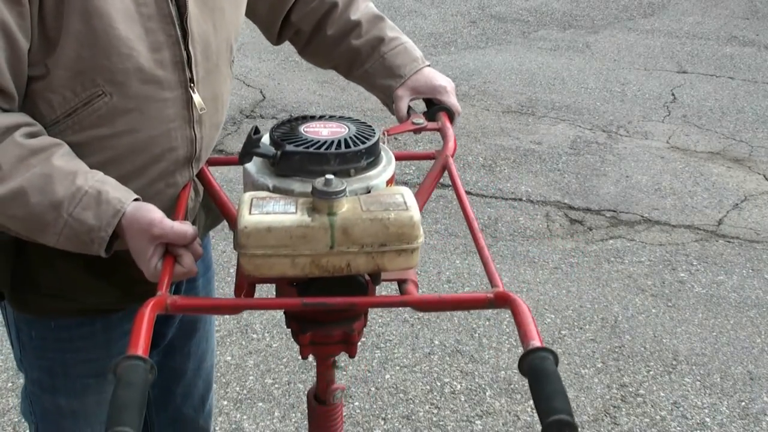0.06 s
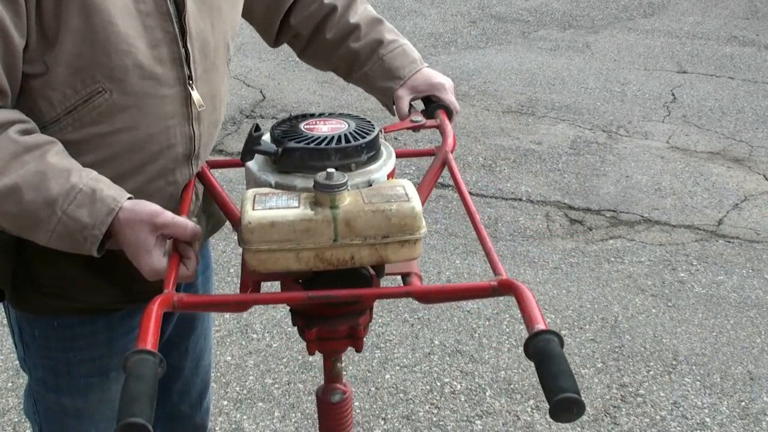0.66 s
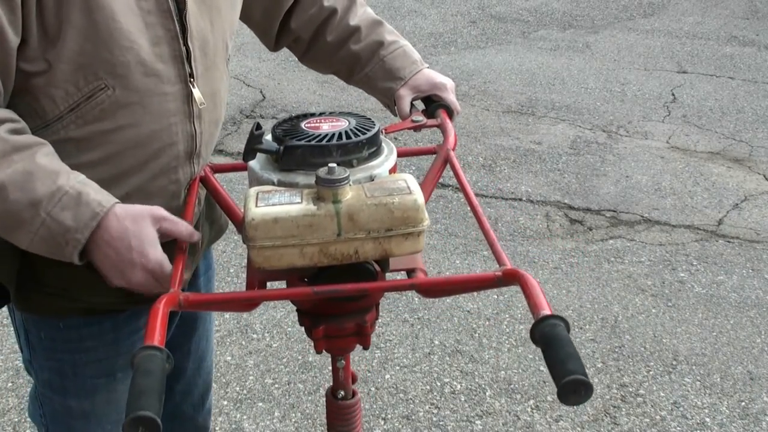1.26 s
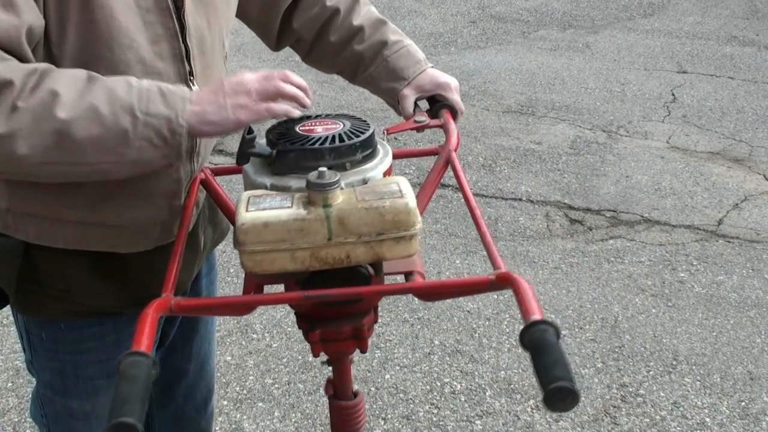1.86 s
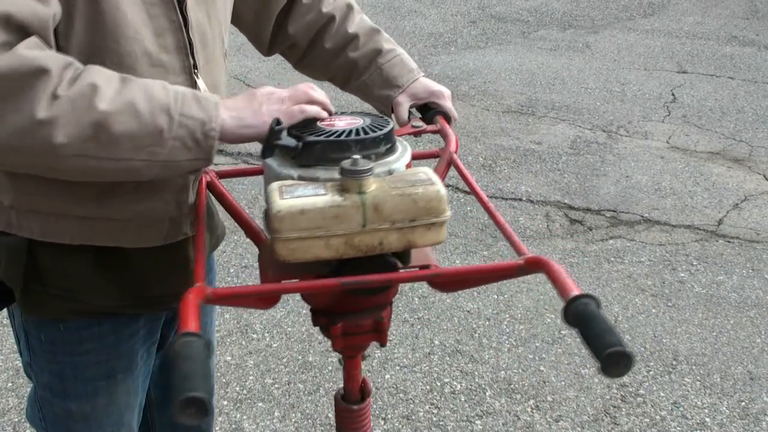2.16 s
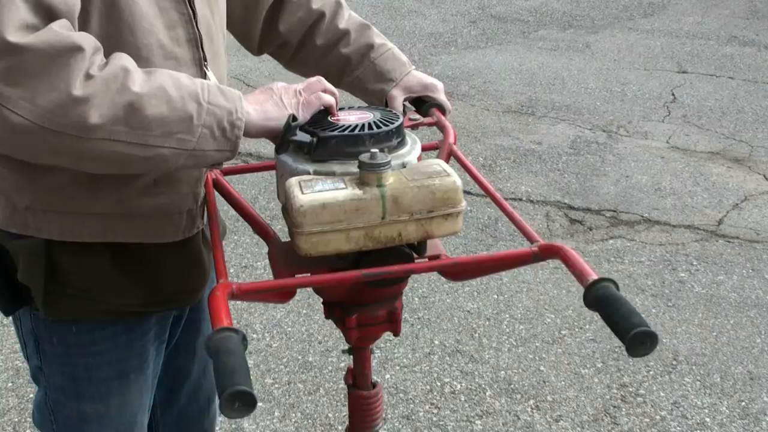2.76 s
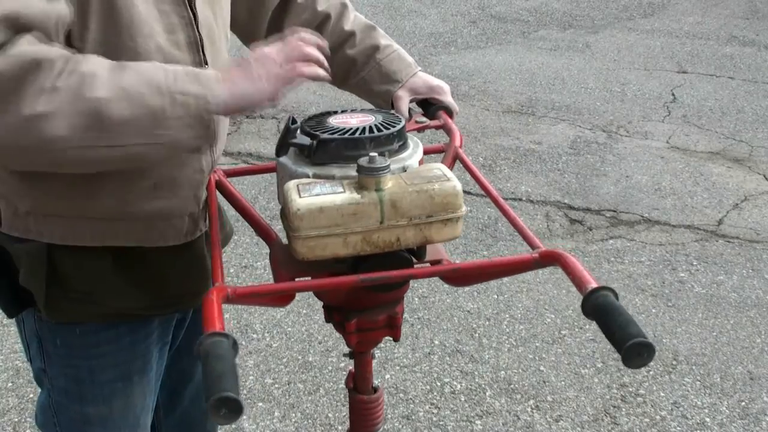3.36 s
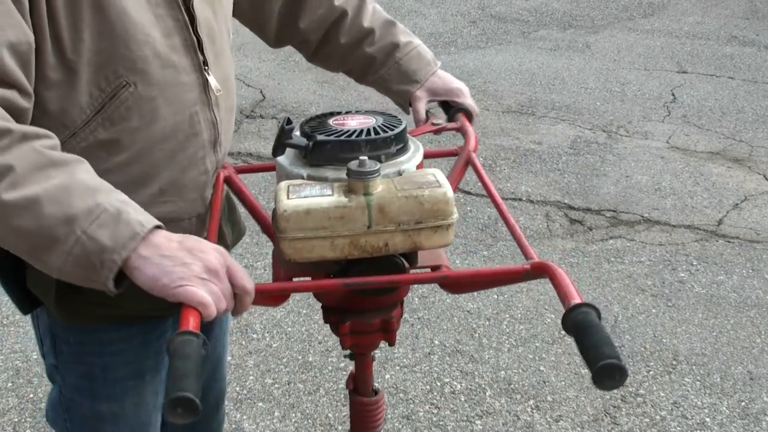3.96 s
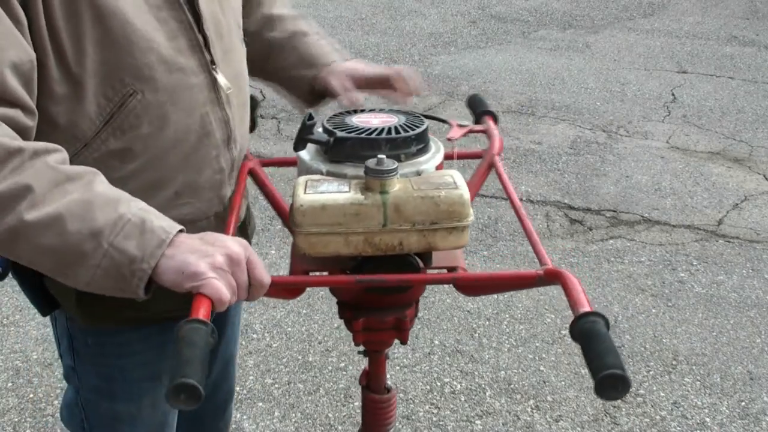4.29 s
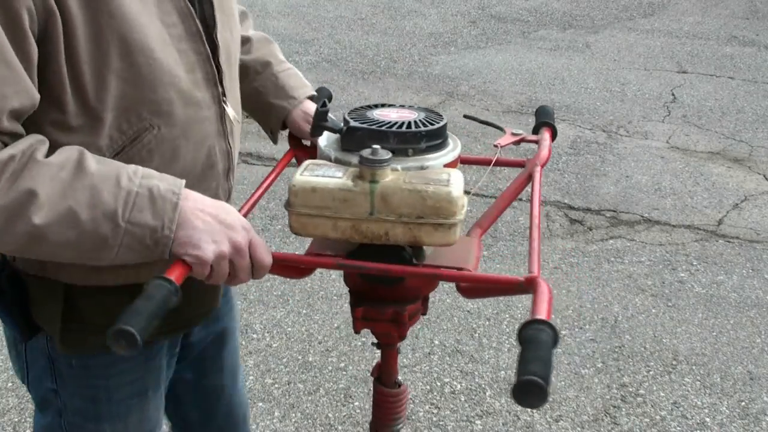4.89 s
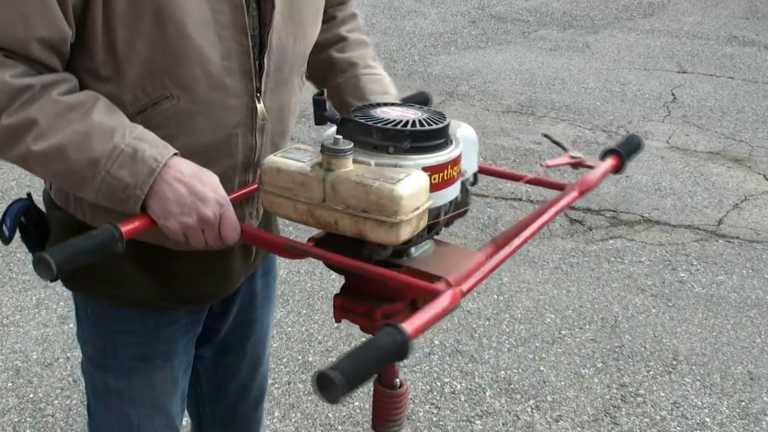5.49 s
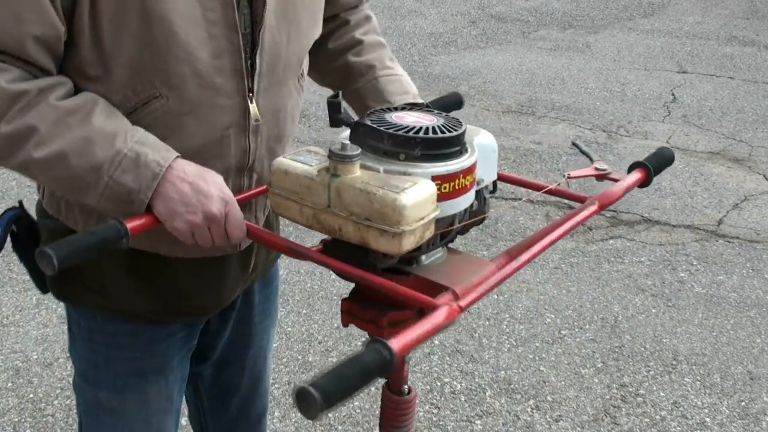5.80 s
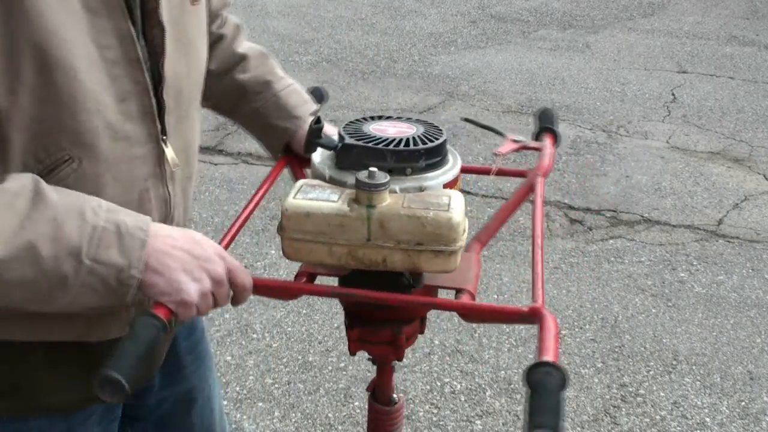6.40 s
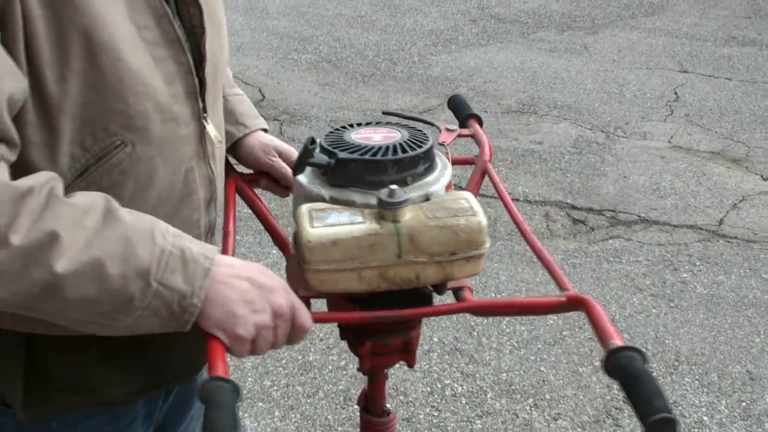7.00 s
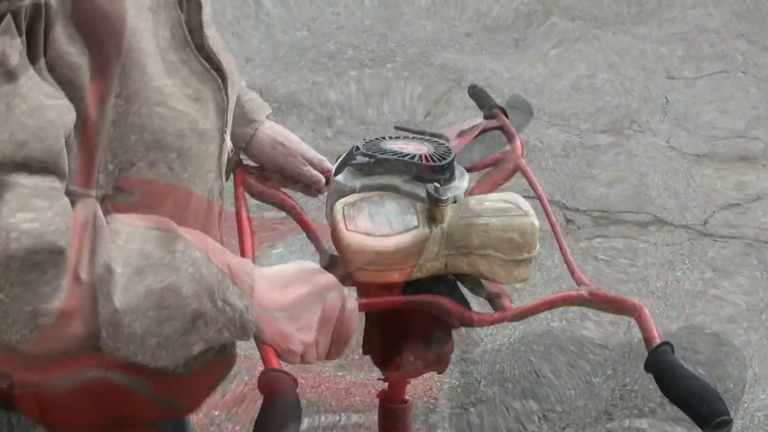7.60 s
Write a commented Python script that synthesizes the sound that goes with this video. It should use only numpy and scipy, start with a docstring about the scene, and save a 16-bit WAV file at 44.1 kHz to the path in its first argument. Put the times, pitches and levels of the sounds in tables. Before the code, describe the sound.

A hole auger's small petrol engine putters near the microphone, with irregular exhaust pops and a tinny metal rattle. The firing stops and the engine coasts down in slowing, hissy chuffs, rocking to a halt a little past halfway. The rest is much quieter: loose steel parts clink and the frame knocks as the machine is tilted, with far-off traffic and light wind in the open air.

```python
"""The small two-stroke engine of a hole auger idles unevenly on asphalt: once a turn, gas pulses excite
the resonances of its muffler and cavities, while its clutch and frame rattle. The ignition is cut:
the piston pumps on ever slower, rocks against compression and stops. The machine is then tilted by
its handles, and loose steel clinks in its natural modes, over distant traffic and a little wind."""
import sys
import numpy as np
from scipy import signal
from scipy.fft import rfft, irfft, next_fast_len
from scipy.io import wavfile
from scipy.ndimage import map_coordinates

SR = 44100
rng = np.random.default_rng(int(sys.argv[2]) if len(sys.argv) > 2 else 0)


def int16_out(signal):
    """Quantize to a 16-bit WAV file."""
    q = np.round(np.clip(np.atleast_2d(signal).T, -1, 1) * 32767)
    wavfile.write(sys.argv[1], SR, q.astype(np.int16))


N = 337365
TIME, AGE = np.arange(N) / SR, np.arange(SR) / SR  # seconds into the scene, and into one event

# The hunting idle. Each row: time in seconds, speed in turns per second.
IDLE_SPEED = [(0.0, 65.43), (0.12, 64.62), (0.44, 51.35), (0.73, 48.73), (0.88, 45.25), (1.12, 45.25),
              (1.48, 51.18), (2.19, 49.71), (2.69, 41.7), (2.88, 40.89), (3.04, 43.49), (3.15, 47.72)]
# Strength of the shaking and of the exhaust, then the level of the air box. Each row: time in seconds, gain in
# dB.
EFFORT = [(0, -0.5), (.35, -1.5), (.5, -3.5), (.72, 1), (1.75, 0.5), (1.8, -4.5), (1.85, 0), (1.95, -0.5),
          (2.0, 2), (2.6, .5), (2.83, -2), (2.92, 0), (3.26, 2), (3.38, 2)]
BOX_LEVEL = [(.35, -27), (.55, -28), (1.65, -28.5), (2.1, -26.5), (3.1, -26.5), (3.35, -22.5)]
# Full charges. Each row: time in seconds, level in dB over an ordinary firing.
BARKS = [(.22, 9), (.307, 9), (.361, 9), (.513, 8), (1.379, 7), (1.518, 7.5), (1.635, 9), (1.695, 6),
         (1.735, 8), (1.775, 7), (1.853, 9), (1.912, 9), (2.031, 9), (2.092, 8), (2.173, 7.5), (2.254, 9),
         (2.336, 8), (2.379, 9), (2.52, 7), (2.695, 7.5), (2.865, 6), (2.939, 6), (3.142, 7)]
# Gas waves. Each row: crank angle and width in turns, cycles per turn, firing and coasting gains in dB.
PORT_WAVES = [(-0.044, 0.13, 5.7, -33, -2), (-0.019, 0.16, 9.1, -12, -0.5),
              (-0.0447, 0.4, 13.57, -8.5, -21), (-0.117, 0.12, 22, -11, -4)]
# Slaps of the drive. Each row: start in seconds, level in dB.
SLAPS = [(.1216, -19.5), (0.169, -14.5), (0.5096, -21), (0.606, -18), (.9448, -22.5), (1.446, -15),
         (1.6134, -16.5), (1.8273, -12.5), (2.249, -15), (2.3314, -21), (2.532, -16.5), (2.6923, -12),
         (2.8604, -17)]
# Loose covers. Each row: peak in seconds, level in dB, half length in seconds, pitch and width in Hz.
BUZZES = [(.17, -41, 0.19, 3950, 200), (1.08, -37.5, 0.86, 3280, 260), (2.454, -35, 0.24, 5030, 600),
          (2.936, -36, .06, 5550, 402), (3.002, -32, 0.31, 864, 110)]
# The last rocks. Each row: time in seconds, knock and puff in dB, flywheel pitch in Hz, its ring in dB.
ROCKS = [(3.916, -17, -36, 934, -44), (4.016, -17.5, -32, 942, -42), (4.145, -22, -41, 980, -55.5),
         (4.3203, -23, -51, 1046, -46.5)]
# Loose steel at the coupling. Each row: start in seconds, strength in dB, number of contacts.
CLINKS = [(4.52, -42.5, 1), (4.673, -46, 1), (4.714, -51, 1), (4.887, -50.5, 1), (5.027, -45.5, 2),
          (5.147, -50, 1), (5.184, -43, 2), (5.239, -47, 3), (5.317, -51, 1), (6.088, -48, 1),
          (6.406, -43.5, 2), (6.999, -47, 1), (7.025, -27.5, 1), (7.1354, -43, 1), (7.492, -51, 1)]
# The coupling's modes. Each row: frequency in Hz, relative level in dB, 60 dB decay time in seconds.
COUPLING_MODES = [(2610, -1, 0.3), (3650, -10, .25), (4580, -1, 0.13), (4980, 0, 0.24), (5430, -9, .2),
                  (5679, -3, 0.12), (7003, 0, .16), (7270, -2, 0.14), (9150, -5, .15)]
# Frame and handles. Each row: start in seconds, level in dB, centre in Hz, 60 dB decay time in seconds.
FRAME_KNOCKS = [(5.963, -48, 5600, 0.014), (6.076, -42.5, 1920, 0.048), (6.567, -27, 4200, 0.0061),
                (6.58, -38.5, 334, 0.13), (6.6, -51, 2650, 0.37)]
# Swells of noise. Each row: peak time in seconds, level in dB, half length in seconds.
CRANK_SWEEPS = [(3.962, -38, 0.0093), (4.095, -42, 0.03), (4.245, -51.5, 0.026)]
STEEL_RUBS = [(4.85, -63, 0.051), (5.25, -56, 0.062), (6.25, -61, 0.12)]
SQUEAKS = [(5.51, -65, 0.033), (6.06, -58, 0.028)]
GUSTS = [(7.3, -45, 0.048), (7.66, -40, 0.09)]
# Resonances. Each row: centre in Hz, bandwidth in Hz, relative gain in dB.
AIR_BOX_MODES = [(648, 142, -7), (690, 38, 0), (845, 38, 3.5), (895, 55, 1.5), (940, 42, 1.5),
                 (1070, 15.6, 3), (1266, 560, -10)]
CHAMBER_MODES = [(448, 113, -2), (646.5, 141, 1)]
FIN_MODES = [(1865, 70, 10.5), (2400, 77, 6), (3350, 250, 7.5), (3945, 40, 11), (5840, 70, 11)]
SHROUD_MODES = [(671, 40, 1)]
BLOCK_MODES = [(924, 13, 10), (1660, 44, -3), (1860, 30, -2), (2210, 29, -13), (2440, 25, 0), (2600, 20, 2)]
SQUEAK_MODES = [(7200, 240, 0)]
# Broad spectra. Each row: frequency in Hz, relative spectral level in dB.
MUFFLER_SPECTRUM = [(45, -43), (80, -23), (125, -23.5), (168, -2), (235, 2), (305, 1), (340, -10),
                    (400, -0.5), (600, -18), (1500, -54)]
CASING_SPECTRUM = [(650, -24), (1100, 3), (1350, -3.5), (2200, -4.5), (3400, -4.5), (4300, -6.5),
                   (5650, -3.5), (6400, -19), (7200, -7), (8200, -13.5), (9300, -8), (10500, -16),
                   (11600, -8.5), (14500, -35)]
INTAKE_SPECTRUM = [(700, -44), (1200, -4), (4000, -5.5), (6100, -10), (7200, -4.5), (9700, -12.5),
                   (12000, -20), (14000, -45)]
CRANKCASE_SPECTRUM = [(240, -49), (400, -12.5), (690, -1), (900, 4), (1400, -5.5), (2550, -9),
                      (3150, -16.5), (4400, -15), (7000, -22), (14000, -48)]
CONTACT_SPECTRUM = [(600, -47), (1400, 3), (2100, -10), (2600, -4), (3700, -10.5), (5200, -9), (7400, -6.5),
                    (8600, -15), (12000, -13.5), (13800, -45)]
TRAFFIC_SPECTRUM = [(25, -11), (100, -3.5), (320, -10), (600, -8.5), (900, -4.5), (1270, -8.5), (2700, -27),
                    (9750, -47), (13000, -68)]
GUST_SPECTRUM = [(25, -17), (60, -11), (170, -10), (500, -27), (1000, -81)]
# The machine's direction. Each row: frequency in Hz, left minus right level in dB.
BALANCE = [(140, -3.5), (400, 4), (1200, 2), (2500, 2.5), (5000, 0.5)]
# Reverberation. Each row: frequency in Hz, 60 dB decay time in seconds.
YARD_DECAY = [(150, 0.36), (900, 0.49), (4000, 0.53), (12000, 0.39)]
# The background. Each row: time in seconds, traffic level in dB, wind level in dB.
AMBIENT_LEVELS = [(4.4, -55, -64), (5, -53.5, -88), (6, -50, -78), (7.6, -49, -64)]


def engine():
    """Superposition: the sources of the running engine add, and fade as the crank slows."""
    effort_db, = curves(EFFORT)
    box_db, = curves(BOX_LEVEL)
    turning = np.interp(TIME, [3.94, 4.0], [1, 0])
    rocking = np.interp(TIME, [3.95, 4.0, 4.3], [1, .6, 0])
    pipe = turning * fading(steepness=6.5) * amp(-28 + .48 * effort_db) * exhaust()
    box = rocking * fading(steepness=3.8) * amp(box_db) * air_box()
    metal = rocking ** 2 * fading(steepness=4.45) * amp(-23.5 + effort_db - 10 * coasting()) * rattle()
    return pipe + box + metal + gasps() + pops() + slaps() + buzzes() + fan()


def crank(kick_s=.065):
    """Inertia against friction and drag gives speed in turns per second, turns made and unevenness."""
    friction, drag = 34.14, .386  # turns per second squared; share of speed lost per second
    kick_speed, rocking_speed = 1.8, 10
    idle, = curves(IDLE_SPEED)
    coarse = TIME[::100]
    since_bark = (coarse[:, None] - np.array(BARKS)[:, 0]) / kick_s
    sag_then_jump = np.sum(np.tanh(10 * since_bark) * np.exp(-since_bark ** 2), axis=1)
    kicks = kick_speed * np.interp(TIME, coarse, sag_then_jump)
    free_s = np.maximum(TIME - IDLE_SPEED[-1][0], 0)
    run_down = (idle + friction / drag) * np.exp(-drag * free_s) - friction / drag
    speed = np.maximum(run_down + kicks, rocking_speed)
    return speed, np.cumsum(speed) / SR, np.interp(TIME, [3.1, 3.3], [1, .07])


def coasting():
    """Combustion ceases: 0 while the engine fires, 1 once the ignition is off."""
    return np.interp(TIME, [3.28, 3.35], [0, 1])


def fading(steepness, corner_speed=33.3):
    """A power law: below the corner, in turns per second, gain falls with crank speed."""
    return (1 + (corner_speed / crank()[0]) ** steepness) ** -.5


def turn_times(angle):
    """Phase crossings: the times at which the crank passes this angle, given in turns."""
    turns = crank()[1]
    return np.interp(np.arange(1, int(turns[-1])) + angle, turns, TIME)


def port_pulses(angle, jitter, scatter_db):
    """A pulse train: pressure jumps once a turn, as the piston passes a port."""
    speed, turns, uneven = crank()
    count = np.arange(1, int(turns[-1]))
    late, strength = noise((len(count), 2)).T * np.interp(count, turns, uneven)
    at = np.searchsorted(turns, count + angle + jitter * late).clip(0, N - 1)
    return np.bincount(at, amp(scatter_db * strength) * np.sqrt(SR / speed[at]), N)


def port_open(angle, width):
    """Periodic gating: a Gaussian window once a turn, of rms 1."""
    offset = (crank()[1] - angle + .5) % 1 - .5
    return unit(np.exp(-.5 * (offset / width) ** 2))


def exhaust(stumble_s=.0008):
    """Source and filter: puffs pass the muffler; while firing, they stray in time and gas rushes after."""
    puffs = port_pulses(angle=-.19, jitter=.014, scatter_db=1.2)
    rush = amp(-9) * (1 - coasting()) * port_open(angle=.08, width=.2) * noise()
    late_s = stumble_s * crank()[2] * wobble(24)
    pressure = unit(coloured(puffs + rush, MUFFLER_SPECTRUM)) + port_waves()
    return np.interp(TIME - late_s, TIME, pressure)


def port_waves():
    """Forced oscillation: gas swings with the piston, so its waves stretch as the crank slows."""
    turns, off = crank()[1], coasting()
    waves = np.zeros(N)
    for angle, width, cycles, firing_db, coast_db in PORT_WAVES:
        offset = (turns - angle + .5) % 1 - .5
        gain = amp(firing_db + off * (coast_db - firing_db))
        waves += gain * port_open(angle, width) * np.sin(2 * np.pi * cycles * offset)
    return waves


def pops(angle=-.2667, jitter_s=.00051, scatter_db=2):
    """Resonators in series: each firing rings the silencer's two like chambers; full charges bark."""
    times, firing = turn_times(angle), 1 - coasting()
    charge_db = scatter_db * noise(len(times))
    for s, db in BARKS:
        charge_db[np.argmin(abs(times - s))] = db
    at = ((times + jitter_s * noise(len(times))) * SR).astype(int).clip(0, N - 1)
    blows = np.bincount(at, amp(charge_db), N) * firing
    chambers = resonate(resonate(blows, CHAMBER_MODES), CHAMBER_MODES)
    return amp(-29.3) * unit(chambers) * np.sqrt(np.mean(firing))


def air_box():
    """Cavity resonance: the ports open in turn and excite the air inside the engine."""
    blowdown = port_pulses(angle=-.2433, jitter=.015, scatter_db=-.5)
    transfer = amp(-4) * port_pulses(angle=-.055, jitter=.017, scatter_db=-3)
    intake = port_pulses(angle=.23, jitter=.0074, scatter_db=1)
    flow = np.sqrt(crank()[2]) * noise()
    cavities = resonate(blowdown + transfer + intake + flow, AIR_BOX_MODES)
    return unit(coloured(cavities, [(150, -52.5), (420, -4), (1300, -14), (3000, -26.5)]))


def rattle(parts_count=12, taps_per_s=75, spread_db=5):
    """Random impacts: loose parts, shaken hardest around each firing, each give their own short ring."""
    shake = 1 + port_open(angle=-.03, width=.22)
    clatter = np.zeros(N)
    for _ in range(parts_count):
        at = np.flatnonzero(rng.random(N) < taps_per_s / SR)
        taps = np.bincount(at, amp(spread_db * noise(len(at)).clip(-2, 1)), N) * shake
        part_ring = (noise(SR) * burst(t60=.076, attack=.00014))[:SR // 20]
        clatter += signal.oaconvolve(taps, part_ring)[:N]
    return casing(unit(clatter) + amp(-11) * noise()) * amp(.9 * wobble(25))


def casing(x, sway_db=3.5, sways_per_s=4):
    """Plate resonance: the metal skin responds broadly, while fins and covers ring out by turns."""
    fins = sum(amp(sway_db * wobble(sways_per_s)) * resonate(x, [fin]) for fin in FIN_MODES)
    return unit(unit(coloured(x, CASING_SPECTRUM)) + amp(-10) * unit(fins))


def slaps():
    """Backlash: now and then the drive crosses its play and slaps the casing."""
    envelope = np.zeros(N)
    for s, db in SLAPS:
        add(envelope, s, amp(db) * burst(t60=.014, attack=.00042))
    return envelope * casing(noise())


def buzzes():
    """Forced vibration: shaken once a turn, loose covers buzz, each for a while."""
    covers = np.zeros(N)
    for s, db, half_s, hz, width in BUZZES:
        shaking = port_open(angle=.05, width=.22) * noise()
        cover = resonate(resonate(shaking, [(hz, width, 0)]), [(hz, 4 * width, 0)])
        covers += swells([(s, db, half_s)]) * unit(cover)
    return covers * (1 - coasting())


def fan(blades=15):
    """Blade-passing tone: the flywheel's fan whines, loudest where its shroud resonates."""
    whine = np.sin(2 * np.pi * blades * crank()[1]) * amp(2.4 * wobble(11)) * fading(steepness=5.2)
    return amp(-31) * np.sqrt(2) * resonate(whine, SHROUD_MODES) * np.interp(TIME, [3.7, 3.9], [1, 0])


def gasps():
    """Flow noise: with the ignition off, the intake port sucks a short hiss of air once a turn."""
    envelope = np.zeros(N)
    for s in turn_times(angle=.27):
        add(envelope, s, burst(t60=.043, attack=.0015))
    drawing = coasting() * np.interp(TIME, [3.66, 3.82], [1, 0])
    return amp(-22.5) * drawing * envelope * unit(coloured(noise(), INTAKE_SPECTRUM))


def last_rocks(knock_speed=23, flywheel_hz=932, moving_t60=.46, resting_t60=.95):
    """A gas spring: compression knocks the crank through its bearing play; block and flywheel ring."""
    knock, puff, flywheel = np.zeros((3, N))
    times = turn_times(angle=-.083)
    slow = (np.interp(times, TIME, crank()[0]) < knock_speed) & (times < ROCKS[0][0] - .05)
    slow_turns = [(s, -15.5, -33.5, flywheel_hz, -33.5) for s in times[slow]]
    for s, knock_db, puff_db, hz, ring_db in slow_turns + ROCKS:
        add(knock, s - .003, amp(knock_db) * burst(t60=.066, attack=.011))
        add(puff, s + .0067, amp(puff_db) * burst(t60=.11, attack=.0019))
        t60 = moving_t60 if s < ROCKS[-1][0] else resting_t60
        add(flywheel, s, amp(ring_db) * burst(t60, attack=.0027) * np.sin(2 * np.pi * hz * AGE))
    chuff = amp(-1.5) * knock * unit(coloured(noise(), CRANKCASE_SPECTRUM))
    grit = noise()
    clank = amp(-8.5) * resonate(knock * grit, BLOCK_MODES) / np.std(resonate(grit, BLOCK_MODES))
    sweeps = swells(CRANK_SWEEPS) * unit(resonate(noise(), AIR_BOX_MODES))
    return chuff + clank + sweeps + puff * unit(coloured(noise(), MUFFLER_SPECTRUM)) + flywheel


def handling(start_s=2.3, ticks_per_s=6.4, rebound_s=.033, rebound_loss_db=5.5):
    """Impact and friction: the coupling clinks, rubs and squeaks; its contacts ring the auger's modes."""
    coupling, impacts = np.zeros((2, N))
    chatter = [(s + k * rebound_s, db - k * rebound_loss_db)
               for s, db, contacts in CLINKS for k in range(round(contacts))]
    ticks = [(s, -55.5) for s in start_s + np.cumsum(rng.exponential(1 / ticks_per_s, 40))]
    for s, db in chatter:
        add(coupling, s, amp(1.17 * db - 9) * ring(COUPLING_MODES))  # light touches barely ring
    for s, db in chatter + ticks:
        add(impacts, s, amp(db) * burst(t60=.063, attack=.00018))
    rubbing = swells(STEEL_RUBS) + amp(-69) * (TIME > start_s)
    contact = (impacts + rubbing) * amp(3 * wobble(160)) * noise()
    blade = ring([(hz, 0, .28) for hz in rng.uniform(1900, 12000, 360)])
    blade_ring = signal.fftconvolve(contact, blade / np.linalg.norm(blade))[:N]
    auger = amp(1.5) * coloured(amp(3) * contact + blade_ring, CONTACT_SPECTRUM)
    squeaks = swells(SQUEAKS) * unit(resonate(noise(), SQUEAK_MODES))
    return coupling + auger + squeaks


def ring(modes, split=.0025):
    """Beating: damped steel modes sound in close pairs, with new strengths at each blow."""
    t = AGE[:SR // 2]
    pair = lambda hz: sum(np.sin(2 * np.pi * (hz * (1 + d) * t + rng.random())) for d in (-split, split))
    return sum(amp(db + 2.7 * noise(1) - 60 * t / t60) * pair(hz) for hz, db, t60 in modes)


def frame_knocks():
    """Damped impacts: frame and handles knock dryly, each in a broad band of noise."""
    knocks = np.zeros(N)
    for s, db, hz, t60 in FRAME_KNOCKS:
        tube = [(hz, .84 * hz, 0)]
        band = unit(resonate(resonate(noise(SR), tube), tube))
        add(knocks, s, amp(db) * burst(t60, attack=.0001) * band)
    return knocks


def yard(x):
    """Reverberation: ground and far walls scatter a weak tail, different at each ear."""
    hz, t, spectra = signal.stft(noise((2, SR // 2)), SR, nperseg=256)
    tail = signal.istft(spectra * amp(-60 * t / along(YARD_DECAY, hz)[:, None]), SR, nperseg=256)[1]
    wet = signal.fftconvolve(x[None], tail / np.linalg.norm(tail[0]), axes=1)[:, :N]
    return coloured(wet, [(180, -5.5), (450, -4), (10000, -5), (13000, -19.5)])


def outdoors():
    """Broadband noise: distant traffic, low moving air and late gusts buffeting the microphone."""
    traffic_db, wind_db = curves(AMBIENT_LEVELS)
    air = amp(wind_db) * stereo_noise([(25, -5), (105, 0), (250, -10), (600, -40)], side_db=-4)
    traffic = amp(traffic_db) * amp([[.6], [-.6]]) * stereo_noise(TRAFFIC_SPECTRUM, side_db=-10.5)
    return traffic + air + swells(GUSTS) * stereo_noise(GUST_SPECTRUM, side_db=.5)


def stereo_noise(spectrum, side_db):
    """Partial coherence: mid and side noise make two channels of rms 1."""
    mid, side = noise(), amp(side_db) * noise()
    return unit(coloured(np.array([mid + side, mid - side]), spectrum))


def amp(db):
    """Decibels to amplitude ratio."""
    return 10 ** (np.asarray(db) / 20)


def unit(x):
    """Normalisation to rms 1."""
    return x / np.sqrt(np.mean(x ** 2) + 1e-20)


def along(points, hz):
    """Interpolation of (Hz, value) points on a log axis."""
    f, v = np.transpose(points)
    return np.interp(np.log(hz + 1), np.log(f + 1), v)


def curves(rows):
    """Linear interpolation in time of each column after the first."""
    s, *cols = np.transpose(rows)
    return [np.interp(TIME, s, c) for c in cols]


def noise(size=N):
    """Gaussian white noise."""
    return rng.standard_normal(size)


def wobble(rate):
    """Random modulation: a smooth curve with rate knots a second."""
    return map_coordinates(noise(int(N * rate / SR) + 4), [TIME * rate])


def burst(t60, attack):
    """Exponential rise and decay, with both times in seconds."""
    return amp(-60 * AGE / t60) * (1 - np.exp(-AGE / attack))


def swells(rows):
    """A sum of Gaussian envelopes."""
    return sum(amp(db) * np.exp(-.5 * ((TIME - s) / half_s) ** 2) for s, db, half_s in rows)


def add(track, s, sound):
    """Superposition of a sound on the track at s seconds."""
    part = track[max(0, round(s * SR)):][:len(sound)]
    part += sound[:len(part)]


def filtered(x, response):
    """Linear filtering: the spectrum of x times a frequency response."""
    n = x.shape[-1]
    padded = 2 * next_fast_len(n // 2 + 4096)
    return irfft(rfft(x, padded) * response(np.fft.rfftfreq(padded, 1 / SR)), padded)[..., :n]


def coloured(x, spectrum):
    """Minimum-phase filtering by a (Hz, dB) spectrum."""
    def response(hz):
        cepstrum = irfft(np.log(amp(along(spectrum, hz))))
        half = len(cepstrum) // 2
        return np.exp(rfft(np.r_[cepstrum[0], 2 * cepstrum[1:half], np.zeros(half)]))
    return filtered(x, response)


def resonate(x, peaks):
    """Second-order resonators in parallel, alternating in sign."""
    def response(f):
        return sum((-1) ** k * amp(db) * 1j * f * width / (hz * hz - f * f + 1j * f * width)
                   for k, (hz, width, db) in enumerate(peaks))
    return filtered(x, response)


def scene():
    """Level differences between the ears place the nearby machine a little to the left."""
    machine = engine() + last_rocks() + handling() + frame_knocks()
    heard = machine + amp(-5) * yard(machine)
    return filtered(heard, lambda hz: amp(np.outer([.5, -.5], along(BALANCE, hz)))) + outdoors()


def record(dry):
    """Band limiting: an ideal low-pass filter removes the highest treble."""
    return filtered(dry, lambda hz: hz < 14400)


dry = scene()
out = record(dry)
int16_out(out)
```